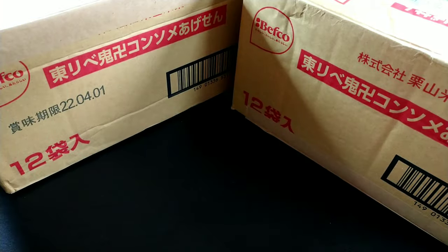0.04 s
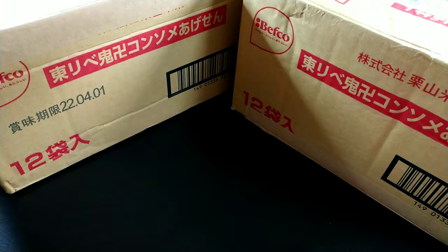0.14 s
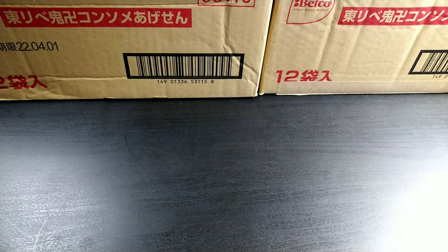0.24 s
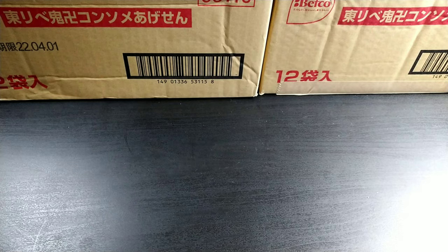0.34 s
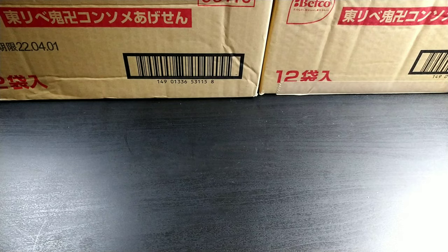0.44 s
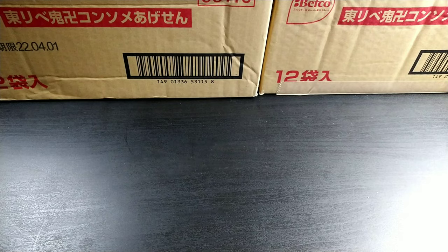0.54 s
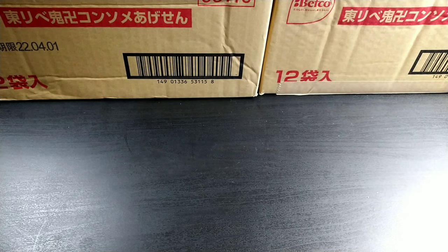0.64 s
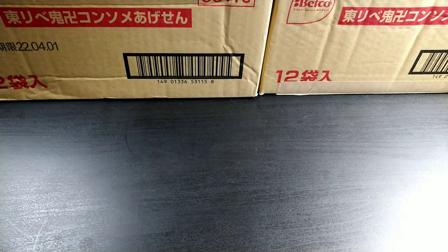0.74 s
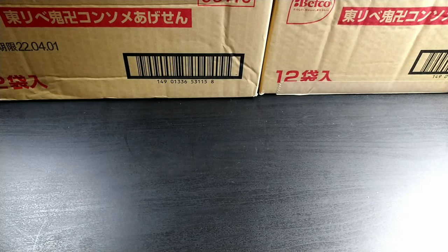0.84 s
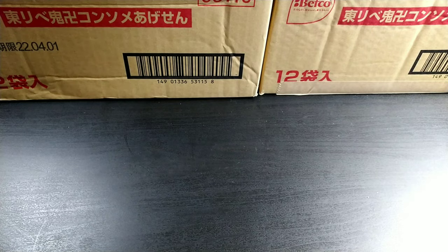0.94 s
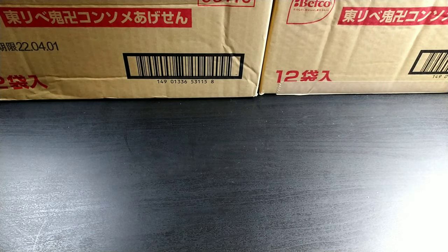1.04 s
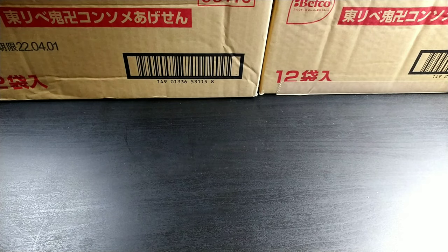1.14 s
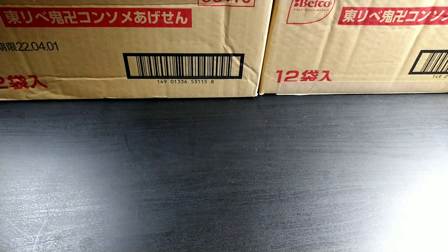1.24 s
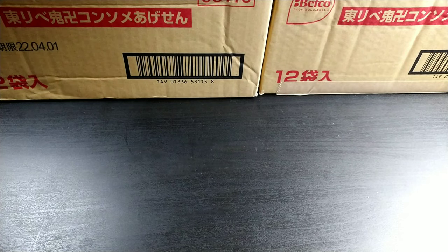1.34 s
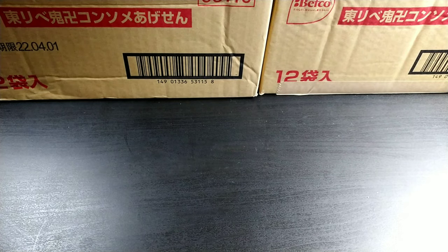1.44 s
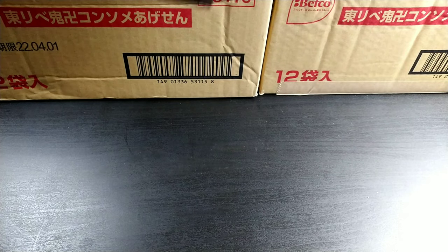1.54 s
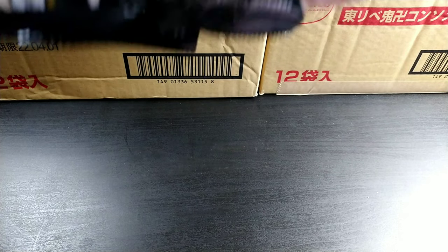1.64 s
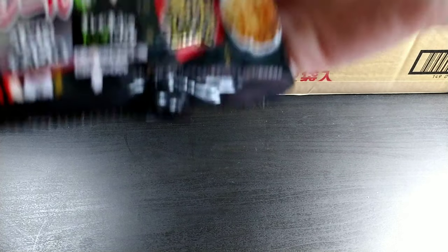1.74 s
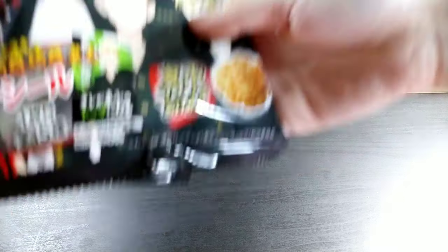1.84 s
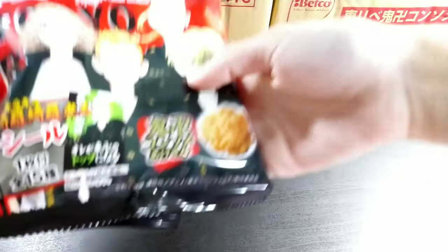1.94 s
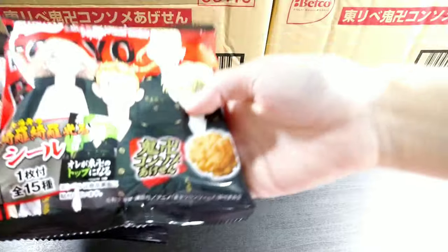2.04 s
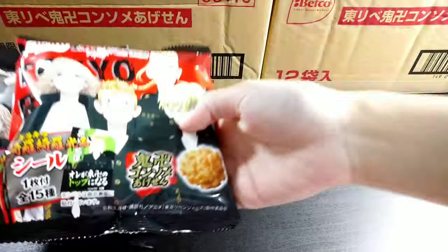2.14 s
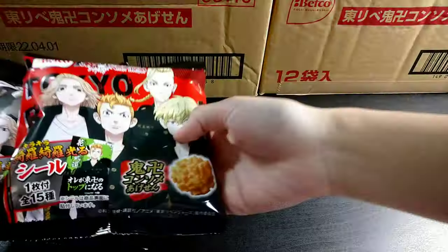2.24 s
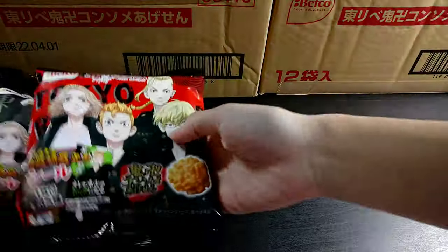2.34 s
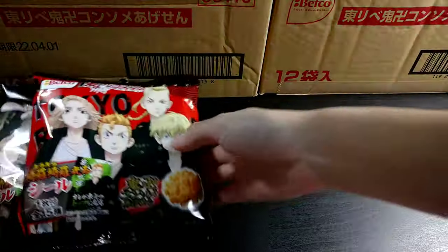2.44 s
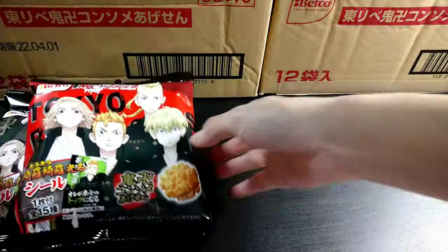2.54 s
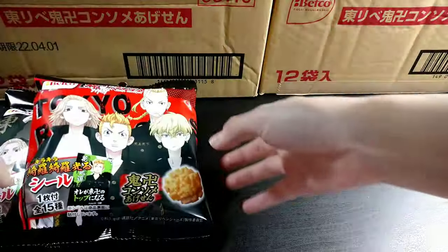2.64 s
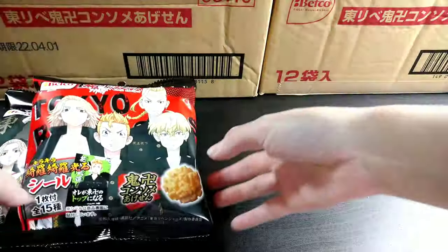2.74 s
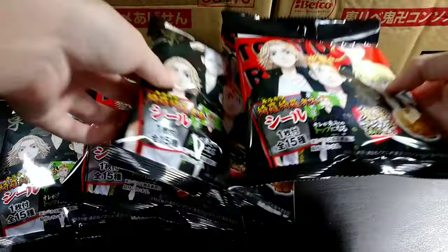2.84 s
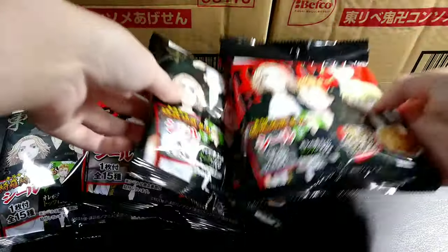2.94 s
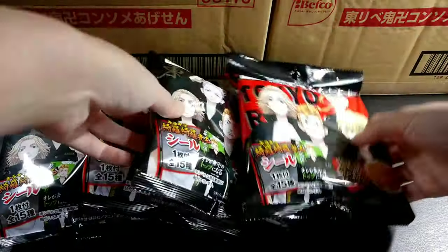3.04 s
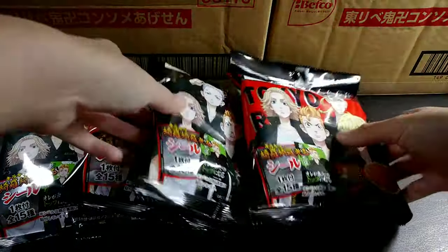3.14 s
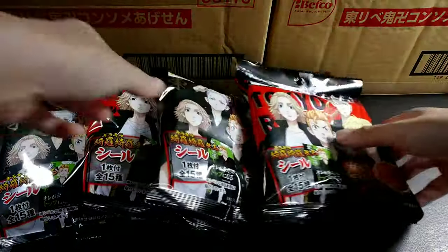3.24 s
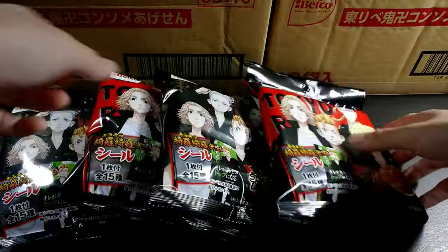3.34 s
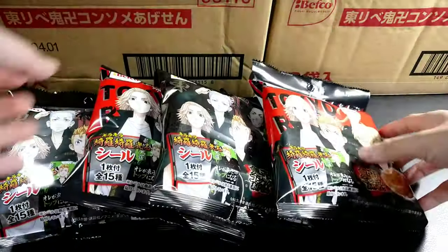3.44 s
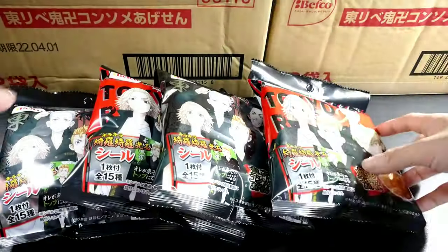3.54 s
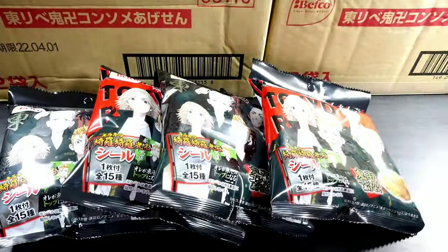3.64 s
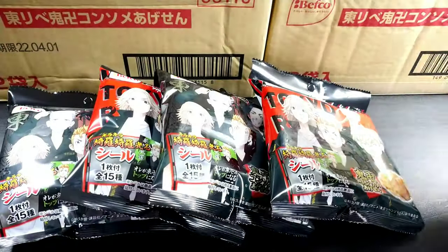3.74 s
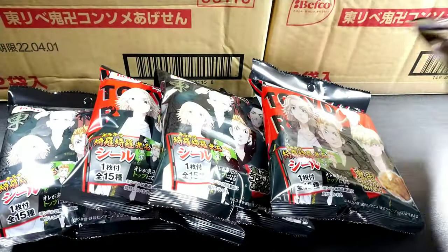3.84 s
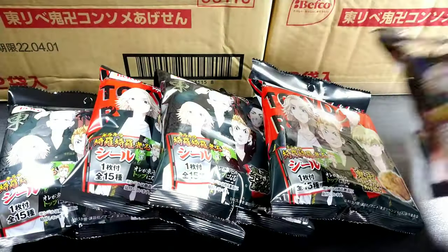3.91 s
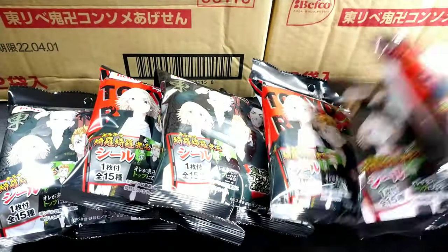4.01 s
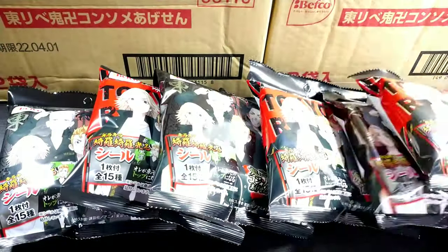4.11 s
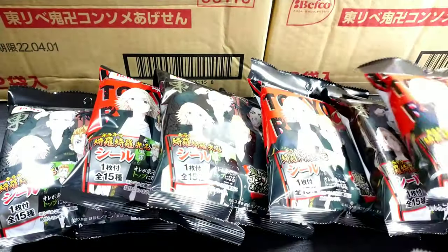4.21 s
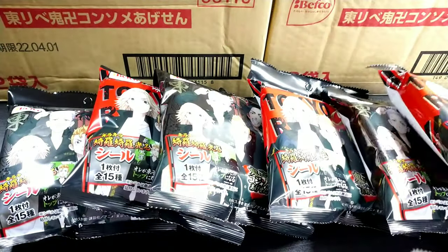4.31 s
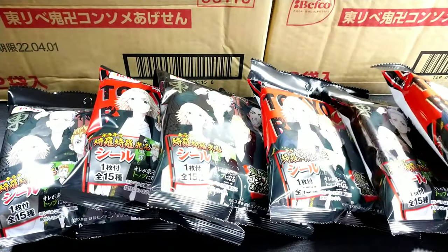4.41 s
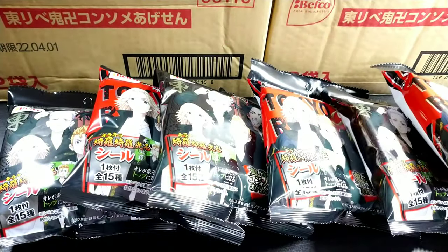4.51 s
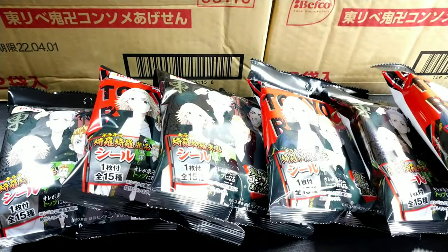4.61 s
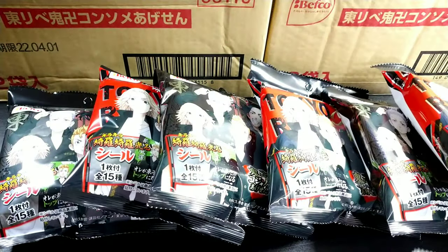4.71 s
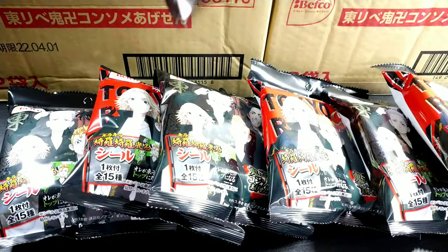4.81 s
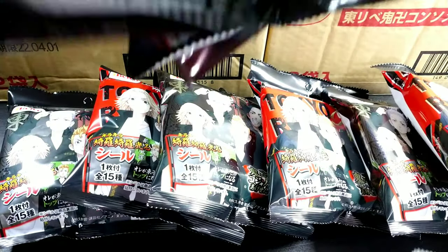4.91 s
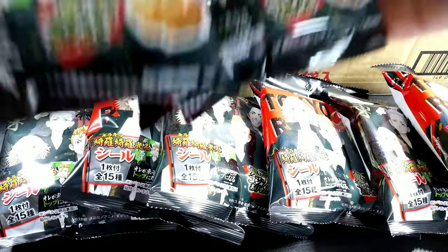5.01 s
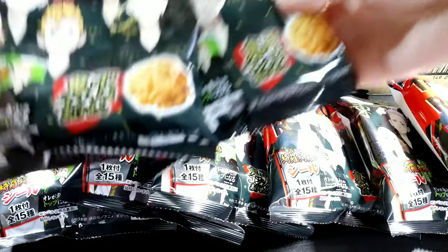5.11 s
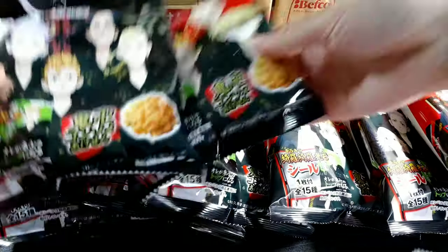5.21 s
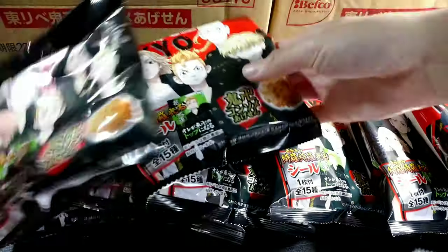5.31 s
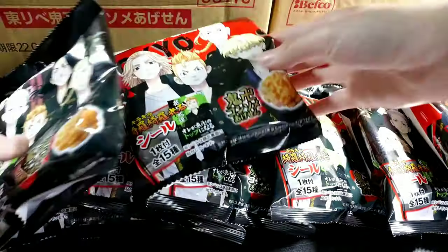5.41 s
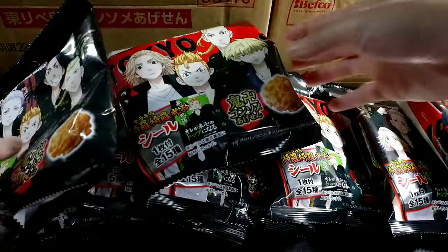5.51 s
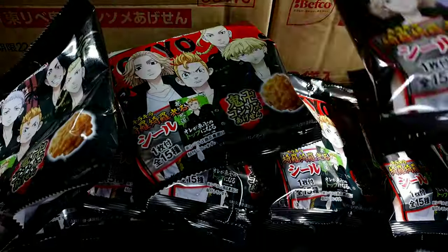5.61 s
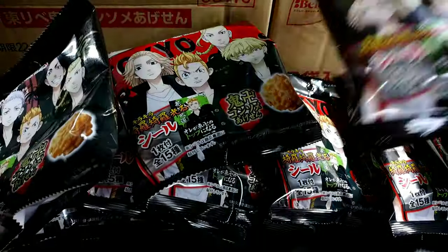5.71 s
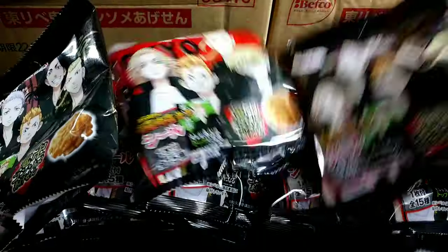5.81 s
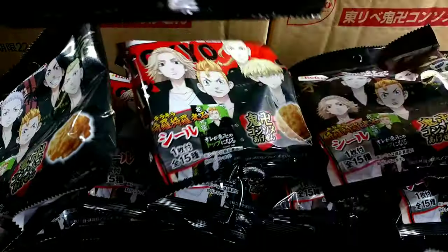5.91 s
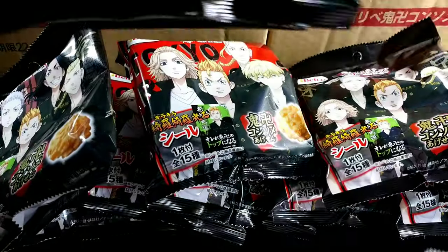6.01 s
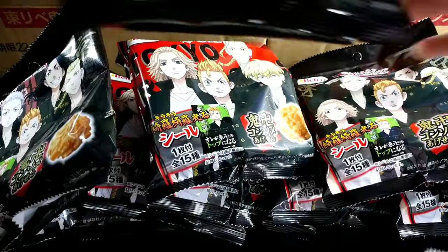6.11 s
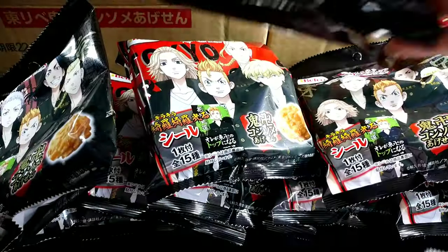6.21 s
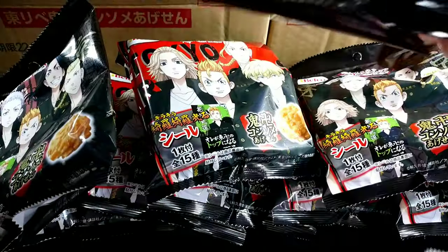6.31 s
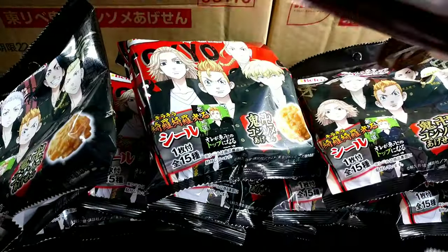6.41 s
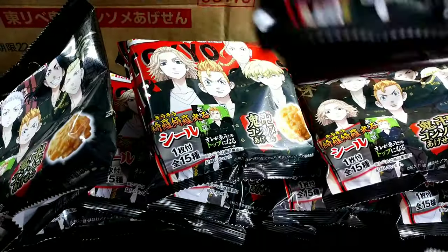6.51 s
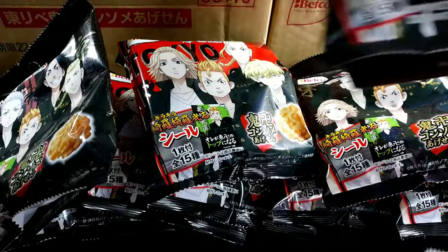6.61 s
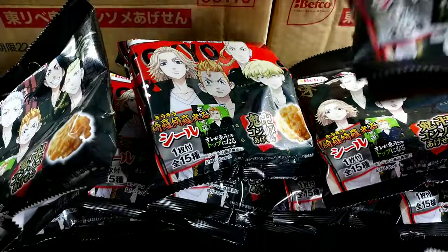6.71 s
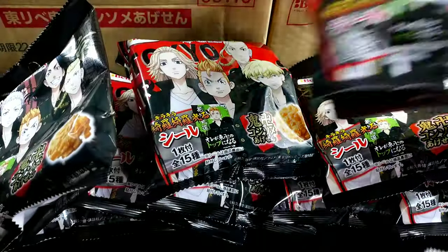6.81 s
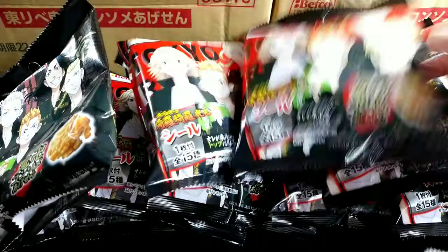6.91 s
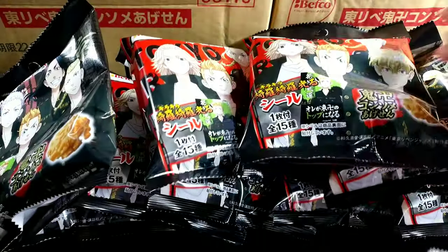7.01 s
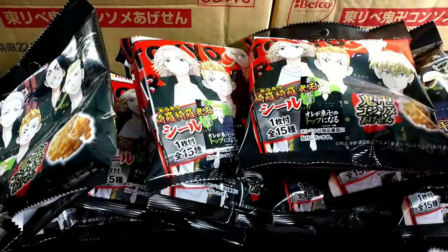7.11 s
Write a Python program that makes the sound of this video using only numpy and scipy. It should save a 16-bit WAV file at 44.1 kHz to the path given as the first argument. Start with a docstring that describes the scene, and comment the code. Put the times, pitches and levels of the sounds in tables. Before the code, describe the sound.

Stiff film bags crackle and pop right by the microphone, with softer film sliding between the bursts. It starts nearly silent, builds to a dense flurry, a sharp loud crunch, a short rest, then more forceful squeezes with bassy knocks and juddering against cardboard. The room is small and dry, with a faint hiss and barely audible rapid ticking beneath.

```python
"""Snack bags out of a cardboard case

A hand digs plastic snack bags out of a case and lays them on a table, close to a mono microphone.
Stiff film buckles in sharp ringing noise bursts over a dense crinkle of gated noise; bags and case thud
as damped sines. A small room answers the snaps and thuds, over a noise floor and a faint tick
60 times a second."""
import sys
import numpy as np
from scipy import signal
from scipy.fft import rfft, irfft, next_fast_len
from scipy.io import wavfile
from scipy.ndimage import uniform_filter1d, map_coordinates

SR = 44100
rng = np.random.default_rng(int(sys.argv[2]) if len(sys.argv) > 2 else 0)


def to_wav(s):
    """Save 16-bit WAV."""
    ch = np.atleast_2d(s).T  # columns
    pcm = np.round(np.clip(ch, -1, 1) * 32767)  # PCM
    wavfile.write(sys.argv[1], SR, pcm.astype(np.int16))


N = 315315


def amp(db):
    """dB to gain."""
    return 10 ** (np.asarray(db) / 20)


def unit(x):
    """Each row brought to rms 1."""
    return x / np.sqrt(np.mean(x ** 2, axis=-1, keepdims=True) + 1e-20)


def along(points, hz):
    """Values read between (Hz, value) points on a log frequency axis."""
    f, v = np.transpose(points)
    return np.interp(np.log(hz + 1), np.log(f + 1), v)


def filtered(x, response):
    """x shaped by a response given as a function of frequency."""
    m = next_fast_len(N + 8192)
    hz = np.fft.rfftfreq(m, 1 / SR)
    return irfft(rfft(x, m) * response(hz), m)[..., :N]


def coloured(x, spectrum):
    """x equalised by (Hz, dB) points, at rms 1."""
    return unit(filtered(x, lambda hz: amp(along(spectrum, hz))))


def wobble(rate):
    """A smooth random curve with rate knots a second."""
    knots = rng.standard_normal(int(N * rate / SR) + 4)
    return map_coordinates(knots, [np.arange(N) * rate / SR])


def place(times, rows):
    """Short sounds, one per row, summed at their start times in seconds."""
    starts = np.round(np.asarray(times) * SR).astype(int)
    index = starts[:, None] + np.arange(rows.shape[1])
    return np.bincount(index.ravel(), rows.ravel(), minlength=N + SR)[:N]


def bursts(t60, attack):
    """Envelopes of small bursts: a fast rise, then an exponential decay."""
    t = np.arange(1024) / SR
    decay = amp(-60 * t / np.clip(t60, .002, .1)[:, None])
    return (1 - np.exp(-t / attack)) * decay


def resonance(hz, centre_hz, width):
    """A causal resonance of peak gain 1; width is a share of the centre."""
    damp = 1j * hz * centre_hz * width
    return damp / (centre_hz ** 2 - hz ** 2 + damp)


# Room and sensor noise. Each row: frequency in Hz, relative density in dB per Hz.
HUSH_COLOUR = [(25, -40), (60, 6.5), (90, -13), (130, -11.5), (350, -17), (1500, -32), (15000, -16.5)]


def hush():
    """Steady noise floor of room and sensor, heaviest in the bass."""
    return amp(-82.5) * coloured(rng.standard_normal(N), HUSH_COLOUR)


def crackle(count, spread_db, t60):
    """Noise gated by many small buckles of very unequal size, at random times."""
    when, luck, length = rng.random((count, 3)).T
    size = amp(-spread_db * np.log(luck + 0.0081))
    envelopes = bursts(t60 * (.5 + length), attack=0.00022)[:, :512]
    gate = place(when * N / SR, size[:, None] * envelopes)
    return unit(gate * rng.standard_normal(N))


def patchy(x, depth_db):
    """Each crease has its own colour: random gain in small patches of time and pitch."""
    z = signal.stft(x, nperseg=256)[2]
    across_pitch = uniform_filter1d(rng.standard_normal(z.shape), size=9, axis=0)
    field = uniform_filter1d(across_pitch, size=3, axis=1)
    return signal.istft(z * amp(depth_db * field / field.std()), nperseg=256)[1][:N]


# Grabs, squeezes and drops of a bag, each swelling to a peak and dying away.
# Each row: peak time in seconds, crinkle, sliding and rumble peaks in dB, seconds to swell 20 dB,
# seconds to die 20 dB. effort() holds both durations between 0.01 and 2 s.
GRABS = [(0.019, -66, -89, -66.5, 0.2, .03), (.05, -91, -95, -72.5, 0.5, 0.2),
         (.345, -73, -78, -91, 0.04, -0.05), (.581, -73, -76, -90, 0.35, 0.7),
         (.668, -67.5, -76, -77, 0.08, .26), (.868, -61, -70.5, -74, 0.1, 0.23),
         (1.15, -71.5, -88, -68, 0.4, 1), (1.3, -70.5, -73.5, -73, 0.54, 1.3),
         (1.448, -62, -72, -72, 0.46, 0.14), (1.699, -57, -66.5, -60, 0.22, 0.21),
         (1.775, -61.5, -67, -62, 0.18, 0.16), (1.96, -62.5, -76, -70, -0.1, 0.14),
         (1.996, -59.5, -64, -73, 0.02, 0.25), (2.44, -69.5, -71.5, -75.5, 0.8, 0.2),
         (2.5, -51.5, -56, -55.5, 0.06, 0.12), (2.561, -48, -54, -55, 0, .11),
         (2.628, -46, -49, -54, 0, -0.01), (2.67, -60.5, -67, -79, 0.08, 0),
         (2.758, -57.5, -59.5, -75, 0.08, 0.04), (3.03, -64.5, -69.5, -70, 0.4, 0.2),
         (3.115, -47, -49.5, -56, .09, 0.16), (3.284, -56.5, -54.5, -66, 0.09, 0.29),
         (3.47, -60, -62.5, -65, 0.08, .1), (3.621, -63.5, -63, -77, -0.44, 0.02),
         (3.752, -65.5, -74.5, -70.5, 0.08, 0.3), (3.858, -65.5, -76, -69, 0.17, .2),
         (4.085, -61.5, -71, -70, 0.14, 0.68), (4.149, -35, -37.5, -51.5, 0.0024, 0.0646),
         (4.27, -57, -53.5, -61, 0.24, 0.17), (4.406, -60, -58, -65, 0, 0.11),
         (4.467, -61, -66.5, -71, 0.2, 0.21), (4.6, -68.5, -86, -84, -3.5, -0.17),
         (4.837, -58, -66, -56.5, 0.11, 0.31), (4.933, -62, -67, -44.5, -0.08, .06),
         (5.028, -65, -58.5, -74, -0.02, 0.02), (5.214, -69, -71, -68, .5, 0.2),
         (5.356, -44.5, -44, -53.5, 0.056, .1), (5.486, -52.5, -53.5, -53, 0.0442, 0.11),
         (5.787, -63.5, -59, -79, 0.04, -0.17), (5.863, -60.5, -64, -57, 0.13, 0.45),
         (5.993, -37, -38.5, -48.5, 0.0467, .07), (6.06, -57, -62.5, -71, -0.02, 0.17),
         (6.291, -50, -53, -44.5, -0.0348, 0.28), (6.41, -51.5, -57, -46.5, 0.14, 0.2),
         (6.52, -50.5, -51, -42.5, .12, 0.15), (6.6, -51.5, -52.5, -46, .1, 0.12),
         (6.675, -50, -51, -41.5, 0.1343, 0.04), (6.815, -67, -60, -72.5, -0.2, -1.5),
         (6.879, -52, -56.5, -58.5, 0.18, 0.17), (7.009, -49.5, -57.5, -50, 0.03, -0.8),
         (7.065, -42, -40.5, -50, -0.01, 0.18), (7.102, -38, -44.5, -44, 0.0555, 0.06)]
# Bags left alone: crinkle, sliding and rumble levels in dB.
RESTING_DB = [-88, -99, -88.5]


def effort():
    """Levels in dB of crinkle, sliding and rumble: the power of all grabs over the resting bags."""
    peak_s, *peaks_db, swell_s, die_s = np.transpose(GRABS)[:, :, None]
    grid_s = np.arange(0, N, 32) / SR
    late = grid_s - peak_s
    dying = late / np.clip(die_s, .01, 2)
    swelling = -late / np.clip(swell_s, .01, 2)
    drop_db = 20 * np.maximum(dying, swelling)
    levels = []
    for peak_db, rest_db in zip(peaks_db, RESTING_DB):
        power = np.sum(amp(peak_db - drop_db) ** 2, axis=0) + amp(rest_db) ** 2
        levels.append(np.interp(np.arange(N) / SR, grid_s, 10 * np.log10(power)))
    return levels


# Crinkle colour. Each row: frequency in Hz, relative density in dB per Hz.
FILM_COLOUR = [(900, -13.5), (1600, 2.5), (2500, 2), (4600, 5.5), (5500, 1.5), (11000, -3.5),
               (13000, -11.5), (15500, -20.5)]


def crinkle(grains, level_db):
    """Film creasing: a light touch is smooth noise, a firm grip brings out the crackling grains."""
    grit = np.interp(level_db, [-68, -48], [.5, .66])
    mix = unit(grit * grains + (1 - grit) * rng.standard_normal(N))
    return amp(level_db) * coloured(patchy(mix, depth_db=2.2), FILM_COLOUR)


# Film sliding on film. Each row: frequency in Hz, relative density in dB per Hz.
SLIDE_COLOUR = [(150, -25), (300, -6), (900, -4), (1500, -10.5), (2500, -13), (5000, -30)]


def sliding(grains, level_db):
    """Film rubbing on film: some of the crinkle's grains, longer sparse crackle and smooth noise."""
    rub = crackle(count=900, spread_db=3, t60=0.049)
    mix = 0.4 * grains + rub + 0.5 * rng.standard_normal(N)
    return amp(level_db) * coloured(mix, SLIDE_COLOUR)


# Case and table flexing. Each row: frequency in Hz, relative density in dB per Hz.
RUMBLE_COLOUR = [(15, -41), (25, -1), (59, 1), (139, -2.5), (264, -8), (375, -12.5), (500, -11),
                 (650, -47.5), (1100, -120)]


def rumble(level_db):
    """Case and table flexing: low noise whose level wobbles at random."""
    noise = coloured(rng.standard_normal(N), RUMBLE_COLOUR)
    return amp(level_db) * unit(amp(5.2 * wobble(40)) * noise)


def handling():
    """Crinkle, sliding and rumble follow the hand; the first two share grains."""
    crinkle_db, slide_db, rumble_db = effort()
    grains = crackle(count=2200, spread_db=3.6, t60=.005)
    return crinkle(grains, crinkle_db) + sliding(grains, slide_db) + rumble(rumble_db)


TICK_HZ = 60


def tick():
    """A faint treble tick of decaying noise 60 times a second, perhaps a camera's focus motor."""
    s = np.arange(.0055, N / SR - .05, 1 / TICK_HZ)
    envelopes = bursts(np.full(len(s), .006), attack=0.0002)
    clicks = place(s, envelopes * rng.standard_normal((len(s), 1024)))
    return amp(-93) * coloured(clicks, [(1000, -30), (3500, 0), (9000, -1), (13000, -20)])


# Loud buckles of the film. Each row: start in seconds, level in dB, low body in dB and high fizz in dB
# (both relative to the level), panel ring in Hz, length in ms.
SNAPS = [(0.013, -71, -3, 8, 6250, 13.7), (0.247, -70.5, -10, -20, 2500, 2.2),
         (0.35, -67, -15, -8, 4540, 2.2), (0.471, -66.0, -14, -7, 3630, 5.5),
         (0.5653, -62, -4, -1.5, 3700, 6.2), (0.6628, -53.5, -7, -1, 2530, 2.7),
         (0.752, -50.5, -13.5, -29, 3400, 2.6), (0.8269, -50, -32, -21, 4040, 5.8),
         (0.8533, -37, -12, -23, 5260, 3.8), (0.861, -46.5, -11, -3, 3800.0, 4.3),
         (0.944, -55.5, -7, -4, 3670, 5.7), (1.083, -57.5, -5, -5.5, 5460, 2.8),
         (1.113, -64, -21.5, -5, 4030, 4), (1.2294, -63, 0.5, 2.5, 2380, 6.5),
         (1.3136, -54, -2, -27, 2760, 4.4), (1.334, -42, -12, -6.5, 2380, 2.1),
         (1.367, -45, -39, -40, 4300, 3.2), (1.4367, -34, -11, -10.5, 4440, 2.15),
         (1.5315, -52.5, -23, -1, 4520, 0.7), (1.6856, -29, -31, -2, 2030, 1.64),
         (1.7098, -50.5, -8, 2.5, 4100, 6.8), (1.7714, -40.5, -3.5, -39, 4770, 3.3),
         (1.808, -53.5, -27, -29.5, 4450, 2.7), (1.9902, -36.5, 1.5, -11, 1570, 3.24),
         (2.2161, -60, 6.5, -9, 1630, 4.9), (2.3392, -41, -12, -40, 4560, 3.3),
         (2.4173, -58.5, -2, 1, 2750, 3.8), (2.4676, -42.5, 2, -16.5, 2480, 3.1),
         (2.481, -55, 7.5, -6, 1310, 4.4), (2.519, -42, -11.0, -5, 4100.0, 2.9),
         (2.5459, -26.5, -8, 1, 4200, 1.4), (2.5461, -32, -2, -15, 1440, 5.1),
         (2.56, -44, -2, -5, 3660, 5.8), (2.5835, -44, -5.5, -18, 6300.0, 0.9),
         (2.617, -39, -5, -24, 2470, 4.6), (2.6243, -39.5, -4.5, -6.5, 3070, 2.4),
         (2.7512, -33, -6.5, -16, 2450, 2.4), (2.889, -38, -5, -15, 2300, 4.6),
         (2.9369, -56.5, 13.5, -22, 1220, 3.1), (3.0032, -50.5, 0, -24, 3570, 2.8),
         (3.075, -47, -15, -22, 4300.0, 4.2), (3.1006, -43.5, -9, -65, 1250, 8.2),
         (3.1182, -42, -9, -24, 2120, 4.6), (3.146, -50.5, -13, -18, 2100.0, 3.4),
         (3.1617, -45, -25, -33, 4220, 3.4), (3.2761, -58.5, -1, -31, 1250, 11.3),
         (3.3025, -34.5, -8.5, -27, 3020, 3.1), (3.464, -40.5, -4, -5.5, 2600.0, 2.1),
         (3.505, -62, 2, -15.5, 1280, 4.9), (3.5929, -58.5, -5.5, -21, 1490, 4),
         (3.746, -58.5, -11, -1, 6000.0, 7.2), (3.8535, -36.5, -11.5, -23, 3700, 2.5),
         (4.003, -56.5, -10, -14, 2020, 3), (4.026, -61, -10, 4, 3000, 3.2),
         (4.0627, -60, -1, 6, 3660, 0.79), (4.089, -52.5, 1, -6, 3700, 3),
         (4.0974, -51, -7, -2, 3000.0, 2.6), (4.1192, -40.5, -12, -15, 1940, 7.1),
         (4.1267, -35.5, -5, -6, 5860, 3.2), (4.1323, -35, 0.5, -21, 2780, 6.1),
         (4.1426, -27.5, -4, -6, 2100.0, 0.84), (4.165, -37.5, -16, -19, 4530, 3.7),
         (4.197, -49.5, 3.5, -34, 3850, 5.1), (4.2135, -50, -4, -21, 4800, 3.4),
         (4.2515, -49.5, 1, -17, 2400.0, 2.4), (4.2824, -38.5, -5.5, -32, 2030, 5.2),
         (4.294, -44.5, -1, -25, 2210, 5.6), (4.3517, -60.5, 8.5, -13, 2070, 4),
         (4.3892, -58.5, -14, -11, 6360, 3), (4.4037, -49.5, 0, -20, 3140, 3.4),
         (4.83, -50.5, 2.5, -22, 3880, 7.2), (4.843, -34, -7, -28, 3940, 2.9),
         (4.9135, -55, 6.5, -14, 3480, 4.3), (4.9276, -46, -13, -32, 3400, 2.3),
         (4.9412, -52, 6.5, -21, 3340, 1.1), (4.9583, -50.5, 2.5, -28, 3200, 2.6),
         (4.9812, -48.5, -19, -8, 4570, 1.3), (5.0507, -60, -15, 2, 6400, 1.8),
         (5.2023, -60, 0, -8, 2280, 2.6), (5.231, -64, 6.5, -32, 3280, 4.1),
         (5.336, -43.5, -7, -19, 3170, 4.1), (5.3434, -41.5, 0, -16, 3900, 4.5),
         (5.3494, -42, 2, -16, 1560, 3.9), (5.3848, -40, -8, -18.5, 2300.0, 1.8),
         (5.4015, -49, -12, -9, 3800.0, 1.4), (5.471, -57.5, 14.5, -24, 1290, 6.7),
         (5.5405, -45.0, -53, -8.5, 4700, 3.9), (5.72, -65, 1.5, 0, 1890, 2.4),
         (5.748, -59.5, -12, -11, 2970, 3), (5.7973, -45, -5, -32.5, 4640, 2.8),
         (5.8596, -64, 4, 11.5, 6500.0, 2.6), (5.9074, -52.5, 0.5, -2, 1250, 7),
         (5.9264, -43.5, -2, -13, 1760, 2.5), (5.9518, -38.5, -10, -7, 1960, 2.2),
         (5.968, -35, -13.5, -11, 2040, 3.6), (5.9889, -33.5, 4.5, -9, 4340, 3.6),
         (5.9962, -28, -3.5, -7, 4150, 6), (6.0024, -50, 4, 11, 3300.0, 5.1),
         (6.032, -39, -0.5, -1.5, 1800.0, 3.4), (6.3036, -41, 1.5, 1.5, 3500.0, 5.3),
         (6.369, -37.5, -9.0, 2, 6900, 1.36), (6.4214, -44, 4, -19, 4460, 4.6),
         (6.4442, -31, -5.5, 1, 2600, 1.44), (6.4813, -55, 12, -27, 1690, 3.8),
         (6.5013, -35, 4.5, -3, 1210, 3.3), (6.5201, -45, 11.5, -23, 1270, 6.2),
         (6.5352, -32.5, -18, -15, 5200, 1.06), (6.5527, -46.5, 9, -13, 1300.0, 3.7),
         (6.5723, -35.5, -24, -9, 4300, 4.3), (6.6171, -39.5, 5, -21, 1460, 3.8),
         (6.6736, -45.5, -4, -21, 2740, 7.6), (6.6914, -58, 10, -26, 1300, 3.9),
         (6.813, -56, -3, -2.5, 6500.0, 4.9), (6.8927, -40.5, 2.5, -30.5, 4000, 2.44),
         (6.9508, -47, -6, -4, 2980, 2.3), (6.988, -42.5, -8, -17, 1770, 4.5),
         (7.0065, -42.5, 5, -35, 1300.0, 4.9), (7.0758, -35, -13, -27, 3770, 15.6),
         (7.086, -38, -14, -8, 4000, 2.9), (7.1036, -41.5, 4.5, -17, 4770, 10.6),
         (7.1133, -31.5, -22, -10, 4830, 1.2), (7.1408, -37, -20, -13, 2800.0, 1.1)]
BODY_HZ, FIZZ_HZ = 977, 7370  # centres of the low and high bands of a snap


def snaps():
    """Each buckle rattles briefly and dies fast; the freed panel rings at its own pitch."""
    s, level_db, body_db, fizz_db, ring_hz, length_ms = np.transpose(SNAPS)[:, :, None]
    t, hz = np.arange(1024) / SR, np.fft.rfftfreq(2048, 1 / SR)
    u = t / (length_ms / 1000)  # time in lengths of the buckle
    rise = 0.031 * length_ms  # short buckles start at once, long crumples swell
    shape = (1 - np.exp(-u / rise)) ** 2 * np.exp(-(u / 0.4) ** 0.85)
    # the crease gives way in jerks, a new random gain every 32 samples
    jerks = np.repeat(rng.standard_normal((len(s), 32)), 32, axis=1)
    noise = rng.standard_normal((len(s), 1024))
    rattle = rfft(shape * amp(3.5 * jerks) * noise, 2048)

    body = resonance(hz, BODY_HZ, 1.97) ** 2
    ring = resonance(hz, ring_hz, 0.15) + 0.38 * resonance(hz, 2800, 1.22) ** 2
    fizz = resonance(hz, FIZZ_HZ, .9) ** 2 / (1 + 1j * (hz / 11500) ** 4)
    bands = [(level_db + body_db, body), (level_db, ring), (level_db + fizz_db, fizz)]
    energy = np.sqrt(length_ms / 1000 * SR / 2048)  # makes each level an rms over the buckle's length
    rows = sum(amp(db) * energy * unit(irfft(rattle * colour, 2048)) for db, colour in bands)
    return place(s[:, 0], rows)


# Decay of the small room. Each row: frequency in Hz, time to die 60 dB in seconds.
ROOM_DECAY = [(200, .15), (1500, 0.24), (5000, 0.15), (14000, 0.13)]


def room(x):
    """Each frequency dies at its own speed; the tail is a fresh random draw every quarter second."""
    wet, step = np.zeros(N + SR), SR // 4
    for start in range(0, N, step):
        hz, t, z = signal.stft(rng.standard_normal(SR // 4), SR, nperseg=256)
        decay = amp(-60 * t / along(ROOM_DECAY, hz)[:, None])
        tail = signal.istft(z * decay, SR, nperseg=256)[1]
        part = signal.fftconvolve(x[start:start + step], tail / np.linalg.norm(tail))
        wet[start + 150:][:len(part)] += part  # the tail starts 150 samples late
    return wet[:N]


# Soft pushes of bags and case.
# Each row: time in seconds (0.6 of a cycle after the onset), level in dB, pitch in Hz.
THUDS = [(.58, -68, 500), (1.232, -65, 650), (1.44, -51, 165), (1.63, -42, 237), (1.692, -50, 188),
         (1.778, -42.5, 252), (2.507, -44.5, 89), (2.549, -44, 225), (2.625, -53, 270), (3.122, -50, 99),
         (3.28, -53, 239), (3.856, -51, 195), (4.139, -36.5, 124), (5.371, -51, 96), (5.476, -39, 92),
         (5.786, -51, 139), (5.859, -51, 143), (5.955, -44, 101), (5.987, -36, 273), (6.009, -37, 373),
         (6.697, -29, 440), (6.834, -42.5, 167), (6.857, -45, 184), (6.953, -51, 289), (7.002, -45, 170),
         (7.074, -37, 369), (7.109, -32, 283)]


def thuds():
    """A squeezed bag pushes air for about two heavily damped cycles; runs of judders join in."""
    s, level_db, pitch_hz = np.transpose(THUDS + judders())[:, :, None]
    turn = np.arange(2048) / SR * pitch_hz  # time in cycles
    envelope = (1 - np.exp(-turn / 0.064)) * np.exp(-(turn / 0.9) ** 2)
    push = np.sin(2 * np.pi * turn) * envelope
    return place((s - .6 / pitch_hz)[:, 0], amp(level_db) * push)


SWISH_S, SWISH_DB, SWISH_LENGTH_S = 2.09, -62.5, 0.23  # middle, peak level, length


def swish():
    """A bag face slides smoothly over another: friction noise centred in the low treble."""
    u = (np.arange(N) / SR - SWISH_S) / SWISH_LENGTH_S
    stroke = np.cos(np.pi * np.clip(u, -.5, .5)) ** 2
    colour = [(1200, -22.5), (2200, -1), (3800, -1.0), (5500, -16), (11000, -13), (14000, -27)]
    return amp(SWISH_DB) * stroke * coloured(rng.standard_normal(N), colour)


# A bag dragged along cardboard sticks and slips in quick runs of pushes.
# Each row: time of the first push in seconds (placed as in the thuds), its level in dB,
# dB change per push, centre pitch in Hz, gap in ms, number of pushes.
JUDDERS = [(4.792, -44.5, 9, 248, 15.3, 2), (4.835, -39.5, -0.5, 176, 14.2, 2),
           (4.918, -38, -0.5, 190, 15.1, 4), (5.016, -37, -3.5, 207, 12.3, 3),
           (6.298, -34, -3.5, 141, 19, 4), (6.385, -36, 7, 128, 18, 2), (6.488, -29.5, -0.1, 151, 14, 4),
           (6.561, -28, -1.5, 157, 11.6, 3), (6.619, -29, -2.5, 170, 14.5, 4)]
JUDDER_SCATTER = 0.073  # typical share by which the pitch strays from push to push


def judders():
    """Each stick-slip run written out as single pushes for the thuds."""
    pushes = []
    for s, db, step_db, hz, gap_ms, count in JUDDERS:
        for k in range(round(count)):
            pitch_hz = hz * (1 + JUDDER_SCATTER * rng.standard_normal())
            pushes.append((s + k * gap_ms / 1000, db + k * step_db, pitch_hz))
    return pushes


def scene():
    """Bags close to the microphone, the room's answer to snaps and thuds, and the floor noise."""
    hits = snaps() + thuds()
    mix = hits + amp(-20) * room(hits) + handling() + swish() + tick() + hush()
    return mix[None]


LOW_CUT_HZ = 50.6
TOP_HZ, EDGE_HZ = 15300, 16700  # start of the treble fade, end of the band


def record(dry):
    """The microphone cuts deep bass; the treble falls 24 dB past the top and stops at the edge."""
    low_cut = signal.butter(3, LOW_CUT_HZ, "high", fs=SR, output="sos")
    lean = signal.sosfilt(low_cut, dry)

    def fade(hz):
        """Gain falling over 500 Hz, held, then zero from the edge."""
        return amp(-24 * np.clip((hz - TOP_HZ) / 500, 0, 1)) * (hz < EDGE_HZ)

    return filtered(lean, fade)


dry = scene()
out = record(dry)
to_wav(out)
```